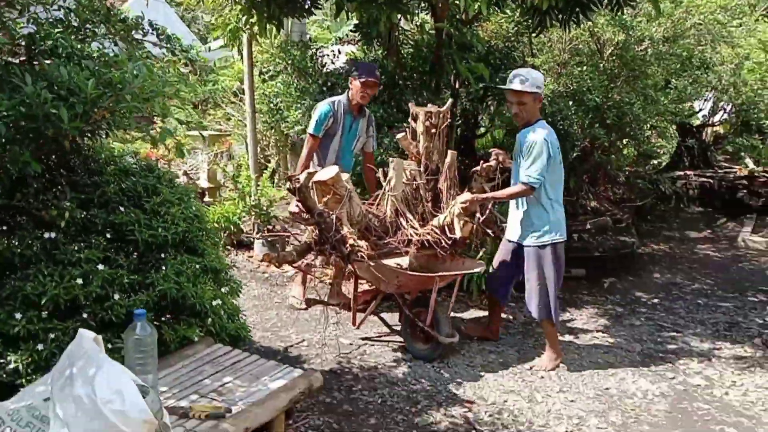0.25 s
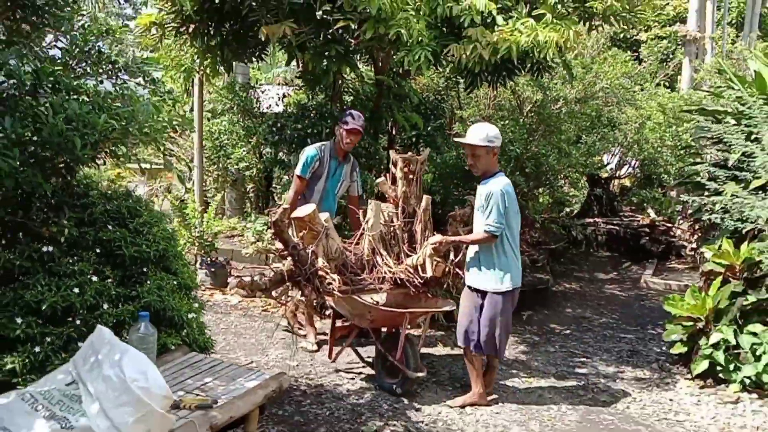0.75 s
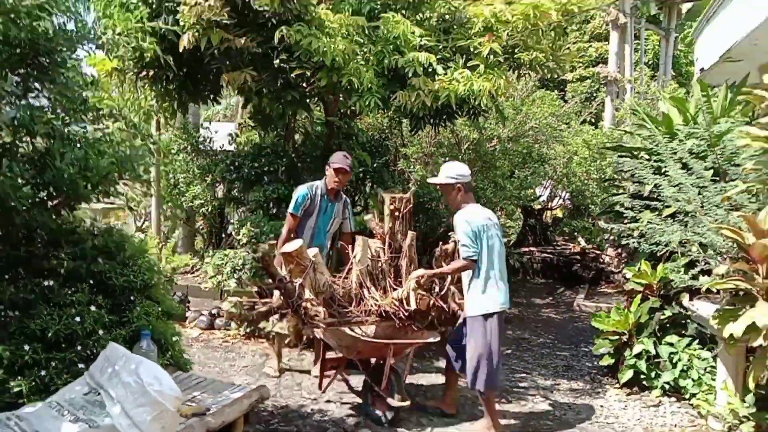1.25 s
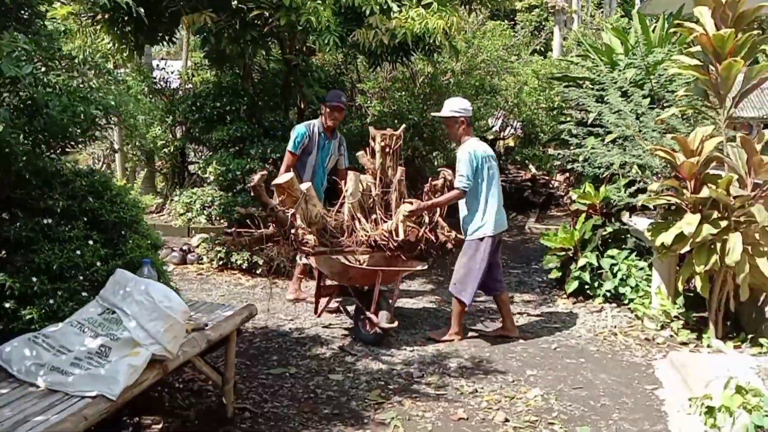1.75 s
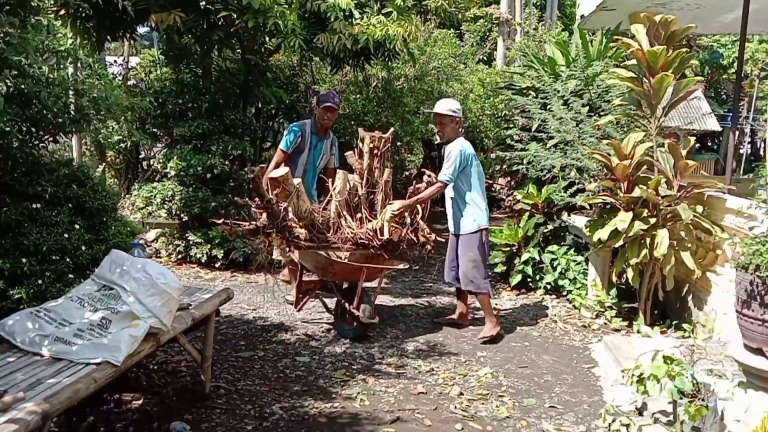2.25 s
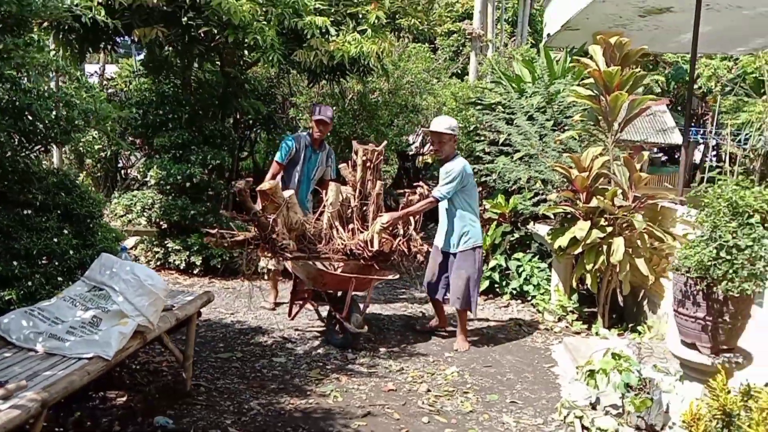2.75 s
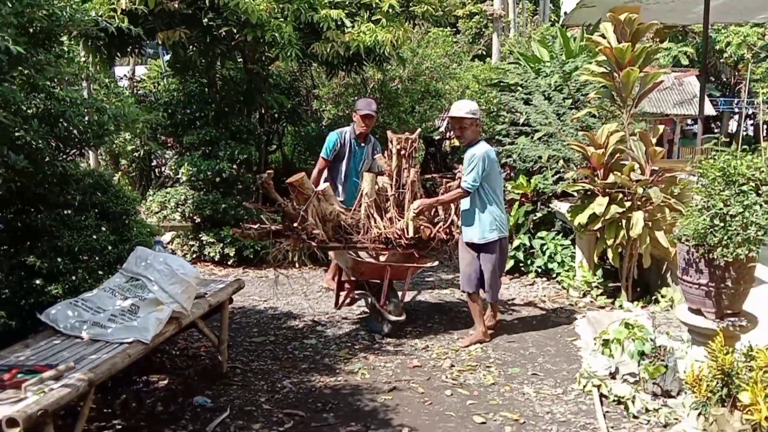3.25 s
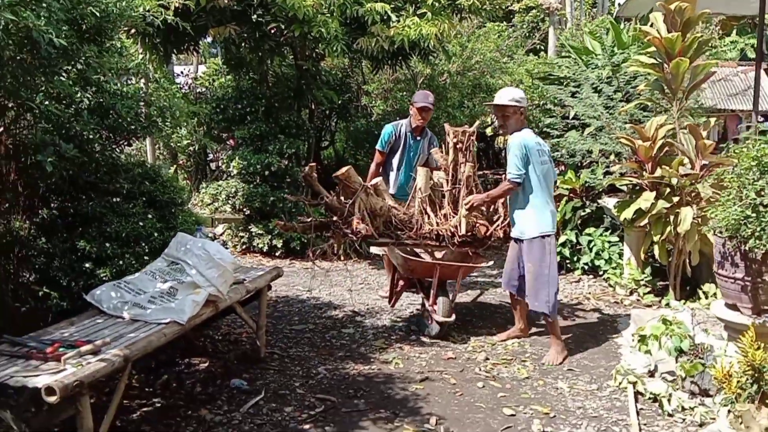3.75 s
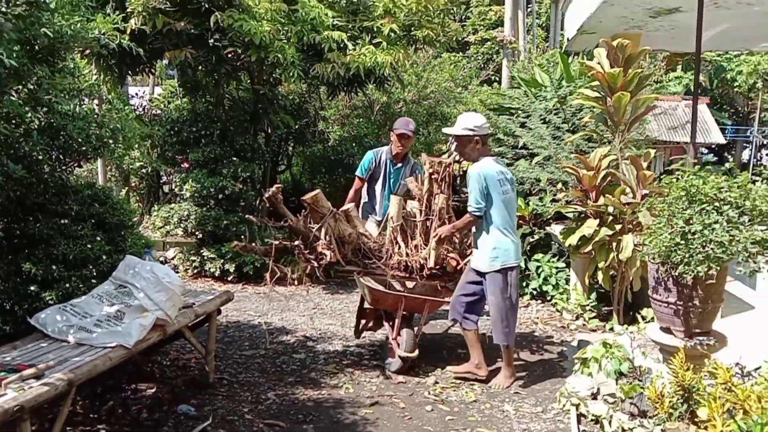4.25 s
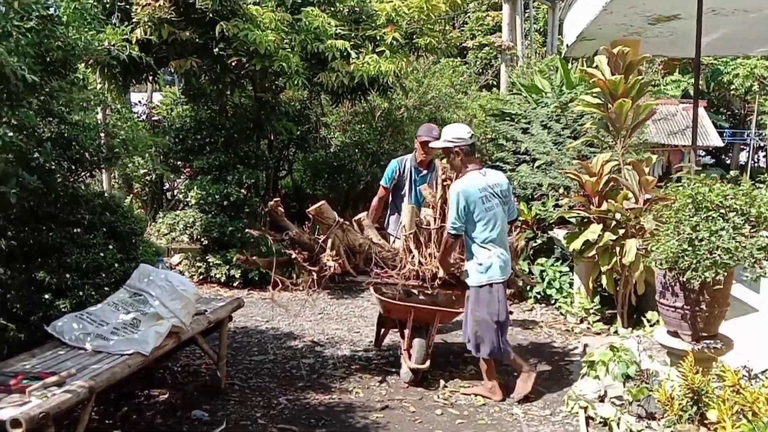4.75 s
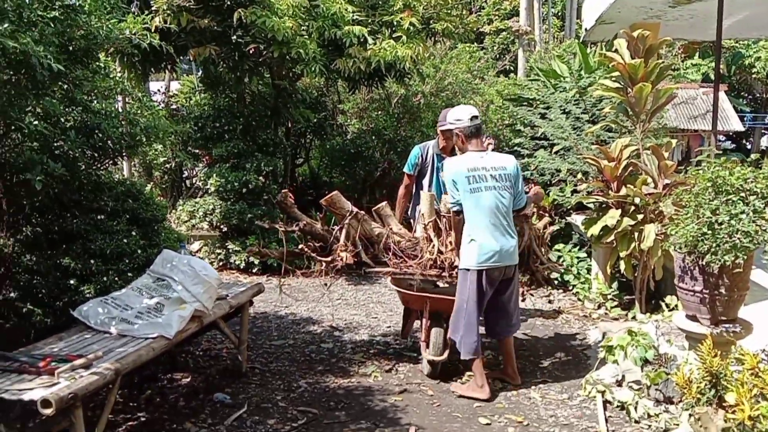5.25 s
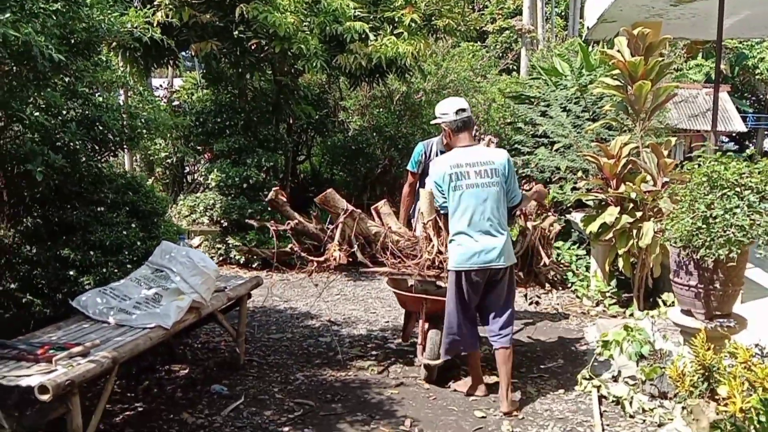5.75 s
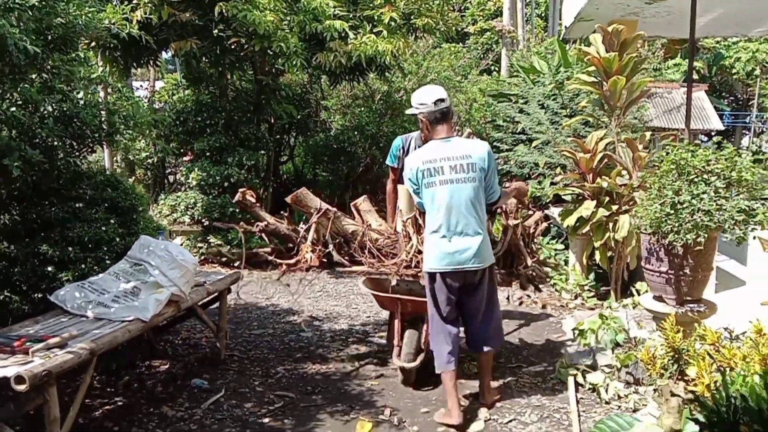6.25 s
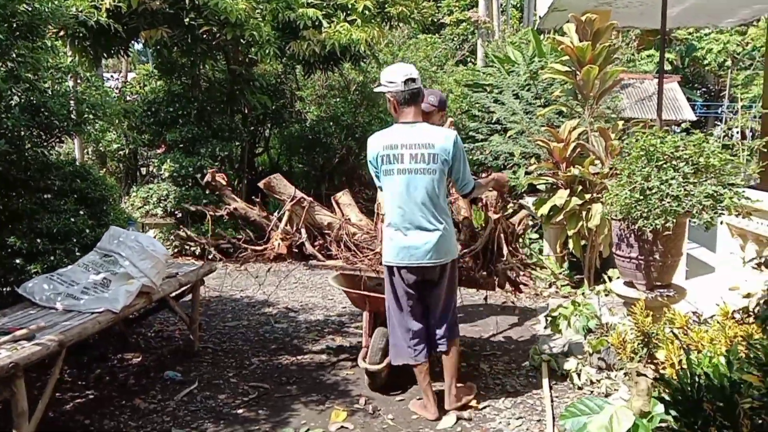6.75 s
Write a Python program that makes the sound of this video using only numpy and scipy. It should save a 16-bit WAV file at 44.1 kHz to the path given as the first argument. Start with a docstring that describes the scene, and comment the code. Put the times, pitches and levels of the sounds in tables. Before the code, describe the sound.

A steady low one-cylinder hum rises as the engine passes, its rough clatter soon dropping away into distance. Over it, a steel barrow carrying a heavy stump knocks sparsely at first, crunches in a busy cluster around the middle, then jolts with muffled low rumbles and little dry ticks. Fine leaf and gravel rustle lies underneath. Open-air handheld pickup, dry, slightly noise-reduced, with hardly any echo.

```python
"""Engine and wheelbarrow in a garden

A small one-cylinder engine throbs and draws away: a sum of exhaust orders, a roar and a patchy clatter
that fades further than the hum. Leaves and fine gravel rustle as filtered noise.
A loaded wheelbarrow rolls over gravel: random slips ring the modes of its steel tray, jolts ring those
of its load, pebbles crack, grit ticks and the axle sings faintly as noise in a narrow resonance."""
import sys
import numpy as np
from scipy import signal
from scipy.fft import rfft, irfft
from scipy.io import wavfile
from scipy.ndimage import uniform_filter1d, minimum_filter1d

SR = 44100
rng = np.random.default_rng(int(sys.argv[2]) if len(sys.argv) > 2 else 0)


def field_ratio(decibels):
    """Amplitude ratio for a level in dB (20 dB per decade); scalars and array-likes work."""
    return 10 ** (np.asarray(decibels, dtype=float) / 20)


def transcribe(u):
    """Save the signal u as a 16-bit wav file named by the first command-line argument.

    u: samples, shape (n,) or (channels, n), limited to [-1, 1]; the rate is SR.
    q: integer samples, one column per channel.
    """
    v = np.clip(np.atleast_2d(u).T, -1, 1)
    q = np.round(v * 32767).astype(np.int16)
    wavfile.write(sys.argv[1], SR, q)


N = 309400

# firing rate, sinking as the engine passes and draws away: (time [s], rate [Hz])
FIRING_RATE = [(0, 29.57), (0.4, 29.56), (0.8, 29.35), (1.2, 28.65), (1.9, 28.41), (2.3, 28.22),
               (2.75, 27.97), (3.1, 27.9), (3.5, 28.14), (3.8, 27.88), (4.5, 27.75), (5.3, 28), (6.1, 28.2),
               (7.02, 27.92)]
# three strong exhaust orders that swell and sink in turn:
# (time [s], order 4 level [dB], order 5 level [dB], order 6 level [dB])
STRONG_ORDERS = [(0, -42.5, -85, -43), (0.12, -45, -40.5, -49), (0.3, -36.5, -37, -39.5),
                 (0.6, -37, -28.5, -36.5), (0.9, -32.5, -29, -33.5), (1.25, -31.5, -29.5, -35.5),
                 (1.55, -35, -37, -31.5), (1.9, -44, -30, -29.5), (2.35, -50, -29, -32),
                 (2.7, -47.5, -32.5, -42), (3.0, -43.5, -32, -39), (3.3, -44.5, -49, -33),
                 (3.55, -44, -42.5, -45), (3.9, -55.5, -42, -50), (4.25, -49, -37, -42.5),
                 (4.699, -62, -39.5, -45.5), (5.15, -49, -34, -43), (5.65, -58, -40, -42),
                 (6.1, -58, -37.5, -45), (6.45, -45.5, -46.5, -42), (6.699, -67, -41, -39.5),
                 (7.02, -64, -37, -37)]
# nearness of the engine, as the level of its clatter: (time [s], level [dB])
NEARNESS = [(0, -40), (0.45, -35), (1.2, -37), (1.95, -37), (2.3, -41), (2.8, -44), (3.3, -46), (3.7, -48),
            (4.3, -50.5), (5, -55), (6.3, -56), (7.02, -52.5)]
NEAREST_DB = -35
# weak orders follow the clatter: (order [1], level when nearest [dB], loss per dB of clatter [dB])
WEAK_ORDERS = [(2, -43, 2), (3, -58, 0.6), (14, -56, 9.5), (15, -55.5, 1.5)]
WAVER_DB, WAVER_PER_S = 1.4, 4  # the weak orders waver slowly
# lowest orders that come back near the end: (order [1], level [dB])
LATE_ORDERS = [(2, -60.5), (3, -46.5)]
LATE_S, LATE_RISE_S = 6.07, 0.12
# higher orders that swell in turn as the engine passes:
# (time [s], then levels of orders 7, 8, 9, 10, 11, 12, 13, 16 [dB])
HIGH_ORDERS = [(0.2, -65.5, -63, -64, -62, -48.5, -54, -69.0, -60),
               (0.45, -50, -53, -54, -44, -45.5, -57, -68.0, -54),
               (0.7, -49, -49, -53, -49.5, -49.5, -46, -55, -46),
               (0.95, -50, -64, -53, -47, -43, -54, -54, -50),
               (1.15, -41, -46.5, -43, -50, -49.5, -52, -57, -64),
               (1.4, -52, -44.5, -58, -40, -51, -43.5, -54, -56),
               (1.65, -43.5, -49, -45.5, -43.5, -47, -50, -59, -56),
               (1.9, -53, -53, -52, -59, -38, -54, -62.0, -65),
               (2.1, -47, -63.0, -56, -54, -47, -43.5, -61.0, -64.0),
               (2.35, -50.5, -68.0, -63, -46.5, -47.5, -54.5, -63, -63),
               (2.6, -52.5, -78, -68, -57, -51, -52, -63, -64),
               (2.9, -61, -63, -64.0, -65.0, -51.5, -60, -64, -82.0),
               (3.15, -56, -57, -65, -55, -51, -51.5, -71, -71),
               (3.45, -61, -67, -74.0, -67, -55.5, -64, -68, -82.0),
               (3.8, -74, -80, -84, -74, -66, -70, -78, -89), (4.5, -66, -70, -76, -79, -75, -80, -88, -92)]
UNEVEN_DB, UNEVEN_PER_DB = .8, .07  # firings differ in size, more so from afar
# low roar of the engine casing: (time [s], level [dB])
ROAR_LEVEL = [(0, -65), (.3, -49.5), (.7, -44), (1.3, -42.5), (1.6, -41.5), (1.85, -51), (2.05, -40),
              (2.2, -63), (2.4, -45), (2.55, -73), (2.7, -57.5), (3, -60), (3.18, -51), (3.35, -53),
              (4, -78), (7.02, -77)]
# spectrum of the roar: (frequency [Hz], relative density [dB per Hz])
ROAR_SPECTRUM = [(300, -42), (430, 10), (520, -2), (700, -9), (880, -6), (1100, -46)]
# spectrum of the engine's clatter: (frequency [Hz], relative density [dB per Hz])
CLATTER_SPECTRUM = [(30, -40), (60, -28), (150, -20), (240, -25.5), (330, -27.5), (560, -26), (900, -24.5),
                    (1200, -22), (1500, -22.5), (1850, -28.5), (3000, -32.5), (4100, -34), (4950, -45),
                    (6000, -40), (7800, -64)]
DULL_PER_DB = 0.3  # from afar the lowest part of the clatter loses this much more

# spectrum of leaves and grit: (frequency [Hz], relative density [dB per Hz])
RUSTLE_SPECTRUM = [(1760, -16.5), (3000, -17), (3500, -13.5), (3830, -2), (4190, -7.5), (4620, -4),
                   (5030, -24), (5240, -7.5), (5660, -4.5), (7910, -2), (8430, -4), (9420, -19.5),
                   (11500, -23.5), (12000, -18.5), (15500, -16.5), (15750, -53)]
# rustle of leaves and fine gravel: (time [s], level [dB])
RUSTLE_LEVEL = [(0, -54), (0.13, -50.5), (1.2, -50), (1.95, -50.5), (2.77, -51), (2.95, -53), (3.65, -54),
                (3.91, -55.5), (4.15, -53), (4.49, -56), (4.73, -55), (4.94, -60), (5.22, -63), (5.43, -60),
                (5.71, -61), (5.86, -57.5), (6.25, -56.5), (6.33, -61), (6.45, -55), (7.02, -55)]
# a flickering band of hiss at 12-15.5 kHz: (time [s], level [dB])
TOP_LEVEL = [(0, -66), (.7, -63), (1.2, -65), (2.0, -63.5), (2.3, -71), (2.9, -72), (3.1, -68), (3.7, -69),
             (3.78, -79), (4.2, -72), (4.4, -73), (4.6, -72), (4.95, -76), (5.2, -77), (5.4, -72),
             (5.6, -77), (6.2, -70), (6.33, -76), (6.48, -68), (6.9, -69), (7.02, -78)]
# spectrum of the top treble: (frequency [Hz], relative density [dB per Hz])
TOP_SPECTRUM = [(11400, -38), (12000, -3.5), (15400, -1.5), (15750, -40)]

# rumbles of the load: (time [s], rise [s], hold [s], fall [s], highest level [dB], first colour centre [Hz])
LOAD_RUMBLES = [(0.021, 0.042, 0.05, 0.033, -35, 480), (4.151, 0.018, 0.076, 0.13, -38, 367),
                (4.305, 0.023, 0.032, 0.083, -39.5, 376), (3.13, 0.044, 0.11, .06, -46.5, 250),
                (5.8, 0.028, .05, .05, -58, 180), (6.53, .04, 0.094, 0.089, -47, 150),
                (5.444, 0.0144, 0.026, 0.096, -38, 526), (5.988, 0.0053, 0.045, 0.053, -42.5, 850),
                (6.09, 0.0205, 0.031, 0.13, -41.5, 650), (6.119, 0.015, 0.049, 0.1, -36.5, 370),
                (6.775, 0.05, 0.025, 0.056, -42.5, 870), (6.79, 0.087, 0.056, 0.087, -33, 424),
                (4.066, .006, 0.028, 0.055, -48, 760)]
# modes of the load: (frequency [Hz], relative level [dB], t60 [s])
LOAD_MODES = [(202, 7, .08), (233, 6, 0.1), (270, 0, 0.059), (318.6, 2.5, 0.071), (410, -3.5, 0.095),
              (485, 1.5, 0.064), (600, -8, 0.16), (699, -11, 0.1)]
ONSET_DB, END_DB, SINK_OCT_PER_S = -13, -22, 1.1  # a rumble swells from ONSET, dies to END and darkens

# stones crunching under wheel and feet:
# (time [s], tray level [dB], tray colour centre [Hz], 2.5-5 kHz level [dB], treble level [dB])
CRUNCHES = [(0.26, -43, 1300, -40, -43.5), (0.562, -23.5, 1240, -46, -48), (0.726, -59, 1180, -34.5, -38.5),
            (0.911, -28, 1370, -40, -43), (1.081, -53, 1060, -42, -45.5), (2.393, -29, 1360, -36, -46),
            (2.535, -32, 1440, -38, -48.5), (2.599, -32, 1300, -79, -78), (2.65, -30, 1230, -42, -50),
            (2.691, -35, 900, -54, -61), (2.827, -35, 1310, -60, -78), (3.068, -60, 1097, -46, -50.5),
            (3.165, -34, 1850, -38, -44), (3.201, -30.5, 1520, -41, -48), (3.528, -34, 1150, -60, -61),
            (3.595, -37, 1014, -67, -84), (3.64, -49, 1230, -63, -74), (3.845, -35.5, 1380, -44, -46.5),
            (3.891, -44, 1700, -62, -58), (3.941, -44, 2190, -37.5, -46), (3.998, -44.5, 1500, -60, -63),
            (4.105, -36, 1070, -44, -52), (4.164, -41.5, 1480, -43.5, -51), (4.216, -49, 1480, -58, -50.5),
            (4.465, -36.5, 1150, -60, -59), (4.505, -42.5, 1150, -53, -68), (5.26, -50.5, 1100, -48, -51.5),
            (5.44, -44.5, 1250, -53, -60), (5.632, -55, 2200, -50, -52), (5.671, -44.5, 985, -51, -53.5),
            (5.912, -35.5, 1750, -41, -48), (5.984, -33, 1600, -35.5, -45.5),
            (6.82, -49, 2100, -50.5, -51.5), (6.904, -42, 1780, -54, -69), (6.933, -51, 1260, -61, -69)]
# sharp knocks of the load on the tray:
# (time [s], tray level [dB], tray colour centre [Hz], 2.5-5 kHz level [dB], treble level [dB])
LOAD_KNOCKS = [(0.668, -28.5, 1540, -53, -70), (1.516, -25.5, 1380, -43, -59),
               (2.055, -25, 1040, -34, -45.5), (2.709, -30.5, 1247, -64.5, -85),
               (2.921, -33, 1260, -70, -60), (4.071, -38, 1837, -45.5, -47), (4.453, -35, 900, -73, -71),
               (4.633, -38, 1540, -52, -57.5), (4.815, -32, 1461, -66, -59), (6.812, -45, 1348, -63, -60),
               (6.901, -35, 1190, -59, -54)]
# modes of the steel tray: (frequency [Hz], relative level [dB], t60 [s])
TRAY_MODES = [(900, 1.5, 0.061), (1230, 13, 0.0081), (1480, 14, 0.018), (1780, 10.5, 0.033),
              (2200, 10.5, 0.03), (2726, -1, 0.026), (3622, -0.5, 0.033), (4460, -7.5, 0.054)]
CRUNCH_T60_S, KNOCK_T60_S = 0.13, 0.12
CRUNCH_RISE_S, KNOCK_RISE_S = 0.015, 0.001

# single pebbles cracking: (time [s], level [dB], pitch [Hz], width of grit [octaves], t60 of grit [s])
PEBBLE_CRACKS = [(2.414, -39, 4030, 0.94, 0.23), (2.555, -34, 3400, 0.35, 0.074),
                 (2.774, -39.5, 3060, 0.83, 0.14), (3.604, -46.5, 3080, 0.62, 0.12),
                 (4.729, -46, 2770, 0.74, 0.079), (4.856, -43.5, 4000, 0.58, 0.078),
                 (6.171, -46, 4250, 0.71, 0.06), (6.655, -39.5, 3610, 0.81, 0.068),
                 (6.654, -45, 2400, 0.11, 0.036), (6.735, -51, 2500, .9, 0.26),
                 (6.765, -48, 3760, 0.55, .1)]
# dry twigs or grit ticking: (time [s], click level [dB], lowest frequency [Hz], puff level [dB])
DRY_TICKS = [(2.516, -52, 10500, -68), (3.845, -48.5, 5000, -65), (4.071, -43, 9000, -50),
             (4.634, -52, 9000, -66), (4.72, -54, 8000, -68), (4.766, -60, 10000, -63),
             (4.804, -60, 12000, -66), (4.856, -50, 9500, -60), (5.842, -60, 2500, -72),
             (5.989, -46, 3500, -57), (6.171, -40, 3500, -61)]
# faint singing of the axle: (time [s], length [s], pitch [Hz], level [dB])
AXLE_SQUEAKS = [(4.14, 0.48, 1480, -59), (4.946, 0.15, 1460, -58), (6.069, 0.1, 1289, -61),
                (6.207, 0.069, 1704, -63), (6.77, 0.28, 1195, -56.5), (6.498, 0.53, 1696, -64.5)]


def evened(x):
    """Normalisation: scales to rms 1."""
    return x / np.sqrt(np.mean(x ** 2) + 1e-20)


def read(points, hz):
    """Interpolation of a spectrum on a logarithmic frequency axis."""
    f, value = np.transpose(points)
    return np.interp(np.log(hz + 1), np.log(f + 1), value)


def curves(rows, t):
    """Linear interpolation: joins the rows of a table by straight lines in time."""
    s, *columns = np.transpose(rows)
    return [np.interp(t, s, c) for c in columns]


def add(mix, s, sound):
    """Superposition: mixes a sound in at s seconds."""
    part = mix[round(s * SR):][:len(sound)]
    part += sound[:len(part)]


def wander(rate, count):
    """Smoothed noise: slow random curves of rms 1 that change about rate times a second."""
    knots = rng.standard_normal((count, N // 256 + 2))
    knots = uniform_filter1d(knots, max(round(SR / 256 / rate), 1), 1)
    knots = uniform_filter1d(knots, size=4, axis=1)
    return [np.interp(np.arange(N) / 256, np.arange(len(k)), evened(k)) for k in knots]


def ring(x, hz, t60):
    """Damped resonance: a mode struck by x; a unit click rings with height about 1."""
    r, w = 1000 ** (-1 / (t60 * SR)), 2 * np.pi * hz / SR
    return signal.lfilter([0, np.sin(w)], [1, -2 * r * np.cos(w), r * r], x)


def band(x, lo_hz, hi_hz):
    """Band-pass filtering, scaled to rms 1."""
    return evened(signal.sosfilt(signal.butter(2, [lo_hz, hi_hz], "bandpass", fs=SR, output="sos"), x))


def patchy(spectrum, patch_db, flicker_db):
    """Modulated noise: random short-time spectra, patchy in time and pitch, with a shared flicker."""
    frames, hz = N // 128 + 5, np.fft.rfftfreq(512, 1 / SR)
    real, imaginary, patches = rng.standard_normal((frames, 257, 3)).T
    patches = uniform_filter1d(patches, size=2, axis=0)
    patches = evened(uniform_filter1d(patches, size=30, axis=1))
    flicker = evened(uniform_filter1d(rng.standard_normal(frames), 5))
    # towards the top the flicker grows and the patches vanish: striped, not patchy
    flicker = flicker * (1 + (hz[:, None] / 10000) ** 3)
    patches = patches / (1 + (hz[:, None] / 10000) ** 4)
    level_db = read(spectrum, hz)[:, None] + patch_db * patches + flicker_db * flicker
    z = (real + 1j * imaginary) * field_ratio(level_db)
    return evened(signal.istft(z, nperseg=512, noverlap=384)[1][:N])


def engine():
    """Harmonic synthesis: exhaust orders in step make one throb a firing, no two quite alike."""
    t = np.arange(N) / SR
    (rate,), (near_db,) = curves(FIRING_RATE, t), curves(NEARNESS, t)
    firings = np.cumsum(uniform_filter1d(rate, size=SR // 3)) / SR + 0.167

    gains = {k: field_ratio(db) for k, db in zip((4, 5, 6), curves(STRONG_ORDERS, t))}
    for (k, db, loss), w in zip(WEAK_ORDERS, wander(WAVER_PER_S, count=len(WEAK_ORDERS))):
        gains[k] = field_ratio(db + loss * (near_db - NEAREST_DB) + WAVER_DB * w)
    for k, db in zip((7, 8, 9, 10, 11, 12, 13, 16), curves(HIGH_ORDERS, t)):
        gains[k] = field_ratio(db)
    late = np.clip((t - LATE_S) / LATE_RISE_S, 0, 1)
    for k, db in LATE_ORDERS:
        gains[k] = np.maximum(gains[k], late * field_ratio(db))

    uneven_db = UNEVEN_DB + UNEVEN_PER_DB * (NEAREST_DB - near_db)
    sizes, lags = wander(15.5, count=len(gains)), wander(5.3, count=len(gains))
    shared, = wander(12, count=1)  # part of each firing's size is common to all orders
    hum = np.zeros(N)
    for (k, gain), own, lag in zip(gains.items(), sizes, lags):
        size = (.7 + .05 * k) * own + .6 * shared  # high orders break up more
        spread = .25 * (k - 5) ** 2  # the pipe smears each throb in time
        phase = k * (2 * np.pi * firings + .02 * lag) + spread
        hum += gain * field_ratio(uneven_db * size) * np.cos(phase)

    puffs = 1 + 0.008 * np.cos(2 * np.pi * (firings - .1))  # the clatter swells a little at each firing
    roar = field_ratio(curves(ROAR_LEVEL, t)[0]) * patchy(ROAR_SPECTRUM, 1.5, .8)
    clatter = patchy(CLATTER_SPECTRUM, 2.2, .8)
    low = signal.sosfiltfilt(signal.butter(2, [230, 460], "bandpass", fs=SR, output="sos"), clatter)
    clatter = clatter - (1 - field_ratio(DULL_PER_DB * (near_db - NEAREST_DB))) * low
    return np.sqrt(2) * hum + roar + field_ratio(near_db) * puffs * clatter


def rustle():
    """Granular noise: leaves and fine gravel hiss in patches, swollen by small random grains, beneath a
    separate flickering band of hiss at 12-15.5 kHz."""
    t = np.arange(N) / SR
    grains = field_ratio(5 * np.minimum(rng.exponential(1, N), 3)) * (rng.random(N) < 200 / SR)
    lumps = evened(signal.lfilter([1], [1, -.99], grains))
    leaves = field_ratio(curves(RUSTLE_LEVEL, t)[0]) * patchy(RUSTLE_SPECTRUM[:13] + [(12200, -50)], 2.2, .8)
    top = field_ratio(curves(TOP_LEVEL, t)[0]) * patchy(TOP_SPECTRUM, 1, 0.71)  # a separate flickering band of hiss at 12-15.5 kHz, with its own level curve
    return (leaves + top) * (1 + .24 * lumps)


def rumble(rise, hold, fall, peak_db, first_hz):
    """Modal excitation: dense jolts ring the load's modes, strongest near a sinking colour centre."""
    t = np.arange(0, rise + hold + fall, 1 / SR)
    level_db = peak_db + np.interp(t, np.cumsum([0, rise, hold, fall]), [ONSET_DB, 0, 0, END_DB])
    centre = first_hz * 2 ** (-SINK_OCT_PER_S * t)
    jolts = rng.standard_normal(len(t)) * (.2 + (rng.random(len(t)) < 250 / SR))
    shifts = rng.uniform(.94, 1.06, len(LOAD_MODES))  # the load lies differently each time
    body = np.zeros(len(t))
    for (hz, db, t60), shift in zip(LOAD_MODES, shifts):
        body += field_ratio(db - 32 * np.log2(hz / centre) ** 2) * ring(jolts, hz * shift, t60)
    body = band(band(body, 117, 800), 117, 800)
    body /= np.sqrt(abs(uniform_filter1d(body ** 2, 2200)) + 1e-9)  # evens out the running level
    return field_ratio(level_db) * body * signal.windows.tukey(len(t), .15)


def stone(low_db, centre_hz, mid_db, treble_db, t60, rise_s, shape, snap):
    """Impact excitation: a swarm of slips rings the tray amid a hiss of grit; a knock adds a snap."""
    t = np.arange(SR // 3) / SR
    chance, size, grit = rng.random(len(t)), rng.standard_normal(len(t)), rng.standard_normal(len(t))
    grit = grit * field_ratio(3.5 * evened(uniform_filter1d(size, size=160)))  # the grit comes in clumps
    rise = np.minimum(t / rise_s, 1)
    fade = field_ratio(-60 * (t / max(t60, .01)) ** shape) * rise  # shape over 1: a roll holds on before it dies
    burst = fade + snap * field_ratio(-60 * t / .02) * rise
    slips = size * (chance < 2200 / SR) * fade
    slips[20] = 1.6 * snap
    shift = rng.uniform(.95, 1.05)  # each blow lands elsewhere

    low = sum(field_ratio(db - 43.0 * np.log2(hz / centre_hz) ** 2) * ring(slips, hz * shift, ring_t60)
              for hz, db, ring_t60 in TRAY_MODES[:5])
    thock = np.sin(2 * np.pi * centre_hz * t) * field_ratio(-60 * t / .025) * snap * .6
    low = low / abs(low).max() + .28 * fade * band(grit, .75 * centre_hz, 1.3 * centre_hz) + thock

    mid = sum(field_ratio(db) * ring(slips, hz, ring_t60) for hz, db, ring_t60 in TRAY_MODES[5:])
    mid = 0.7 * mid / abs(mid).max() + .5 * burst * band(grit, 2250, 4730)

    hz = np.fft.rfftfreq(len(t), 1 / SR)
    colour = field_ratio(read(RUSTLE_SPECTRUM, hz) + 1.8 * (hz > 11500)) * (hz > 5000)
    treble = burst * evened(irfft(rfft(grit) * colour, len(t)))
    return field_ratio(low_db) * low + field_ratio(mid_db) * mid + field_ratio(treble_db) * treble


def pebble(db, hz, octaves, t60):
    """Brittle impact: a crack rings briefly at one pitch and leaves a puff of grit around it."""
    t = np.arange(SR // 5) / SR
    grit = band(rng.standard_normal(len(t)), hz * 2 ** (-octaves / 2), hz * 2 ** (octaves / 2))
    puff = 0.42 * grit * field_ratio(-60 * (t / max(t60, .02)) ** 1.46)
    crack = np.sin(2 * np.pi * hz * t) * field_ratio(-60 * t / 0.027)
    return field_ratio(db) * np.minimum(t / 0.00076, 1) * (crack + puff)


def tick(db, lo_hz, puff_db):
    """Broadband transient: a sharp click of noise and a short puff of hiss."""
    t = np.arange(SR // 10) / SR
    hiss = band(band(rng.standard_normal(len(t)), lo_hz, 15400), lo_hz, 15400)
    click, puff = field_ratio(db - 60 * t / 0.0097), field_ratio(puff_db - 60 * (t / 0.059) ** 2)
    return hiss * np.minimum(t / .0015, 1) * (click + puff)


def squeak(length, hz, db):
    """Narrow-band resonance: noise in one mode makes a fuzzy whistle."""
    count = round(length * SR)
    whistle = evened(ring(rng.standard_normal(count), hz, 0.1))
    return field_ratio(db) * whistle * signal.windows.tukey(count, .6)


def scene():
    """Superposition: engine, rustle and barrow outdoors, the barrow's blows with one ground echo."""
    barrow = np.zeros(N)
    for s, *blow in CRUNCHES:
        add(barrow, s, stone(*blow, CRUNCH_T60_S, CRUNCH_RISE_S, shape=1.84, snap=0))
    for s, *blow in LOAD_KNOCKS:
        add(barrow, s, stone(*blow, KNOCK_T60_S, KNOCK_RISE_S, shape=1.4, snap=2.2))
    for s, *crack in PEBBLE_CRACKS:
        add(barrow, s, pebble(*crack))
    for s, *click in DRY_TICKS:
        add(barrow, s, tick(*click))
    for s, *song in AXLE_SQUEAKS:
        add(barrow, s, squeak(*song))
    barrow[180:] += 0.13 * barrow[:-180]  # echo off the ground after 180 samples
    for s, *jolting in LOAD_RUMBLES:  # the rumbles have no echo
        add(barrow, s, rumble(*jolting))
    return (engine() + rustle() + barrow)[None]


def suppress(x, strength, floor_db):
    """Spectral subtraction: takes each bin's lowest recent level for noise; lucky bins pass as streaks."""
    hz, _, z = signal.stft(x, SR, nperseg=512, noverlap=384)
    now = abs(z) ** 2 + 1e-18
    power = signal.lfilter([.06], [1, -.94], now, zi=.94 * now[..., 8:40].mean(2, keepdims=True))[0]
    lowest = uniform_filter1d(minimum_filter1d(power, size=121, origin=60), size=40)
    # loud stretches pass almost whole
    noise = np.minimum(lowest, 1.3 * np.median(lowest, 2, keepdims=True))
    noise = uniform_filter1d(noise, size=7, axis=1)
    # a sudden sound opens the way at once
    sudden = .36 * uniform_filter1d(now, size=9, axis=1) * (hz[:, None] > 700)
    power = np.maximum(power, sudden)
    gain = np.maximum(1 - strength * noise / power, field_ratio(floor_db))
    gain = gain ** np.clip((hz[:, None] - 330) / 120, 0, 1)  # the hum passes
    return signal.istft(z * gain, SR, nperseg=512, noverlap=384)[1][:, :N]


def top_cut(x):
    """Nothing passes above the cut-off."""
    return signal.sosfilt(signal.butter(12, 16410, fs=SR, output="sos"), x)


def record(dry):
    """High-pass response: the microphone loses the deepest bass; a noise suppressor follows."""
    heard = signal.sosfilt(signal.butter(2, 45, "highpass", fs=SR, output="sos"), dry)
    heard = heard * np.minimum(np.arange(N, 0, -1) / 300, 1)  # a short fade at the end
    finished = suppress(heard, strength=1.35, floor_db=-14)
    return top_cut(finished)


dry = scene()
out = record(dry)
transcribe(out)
```